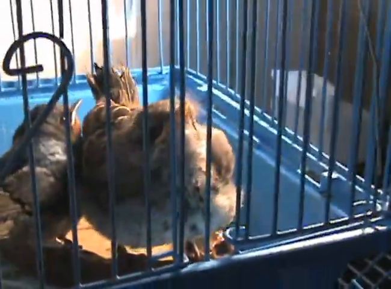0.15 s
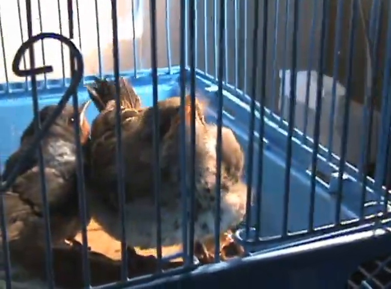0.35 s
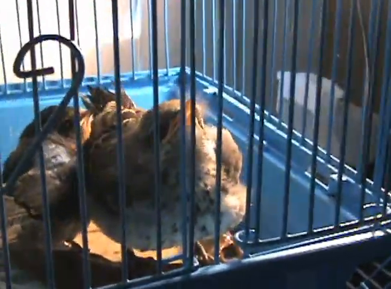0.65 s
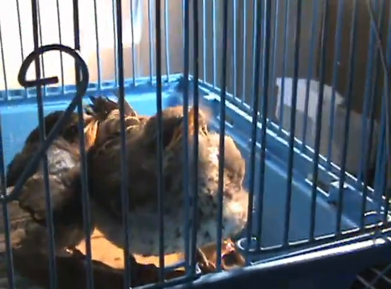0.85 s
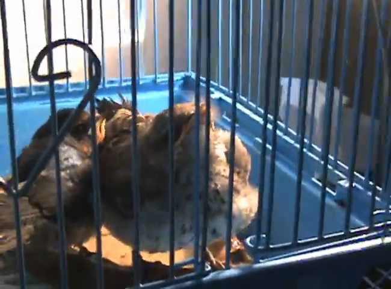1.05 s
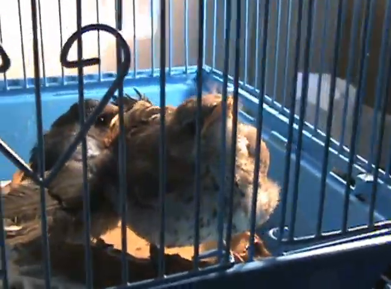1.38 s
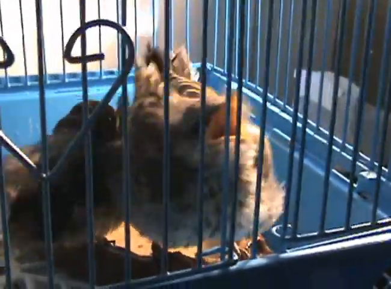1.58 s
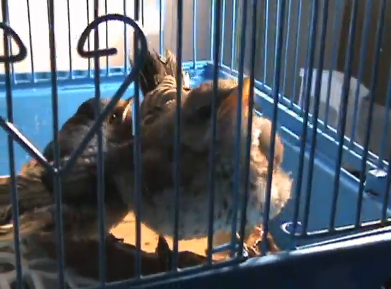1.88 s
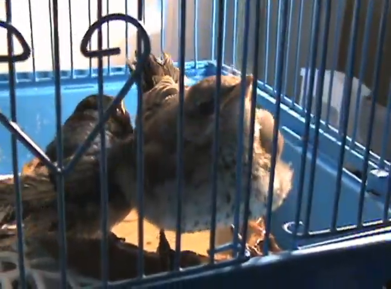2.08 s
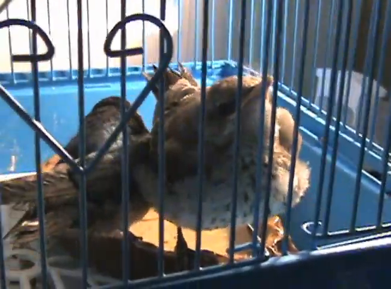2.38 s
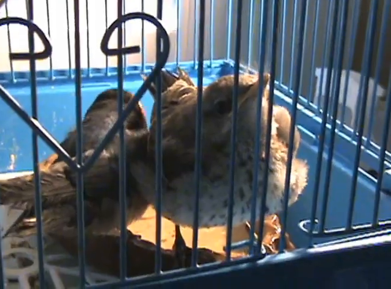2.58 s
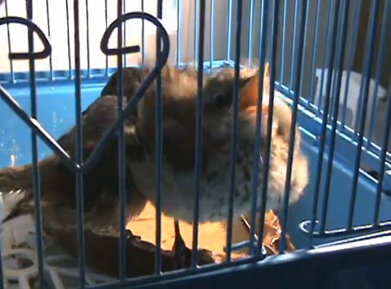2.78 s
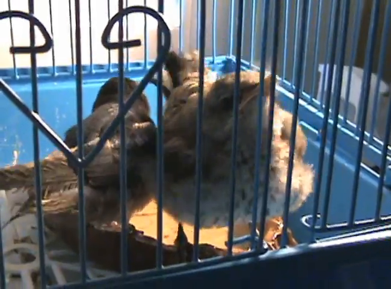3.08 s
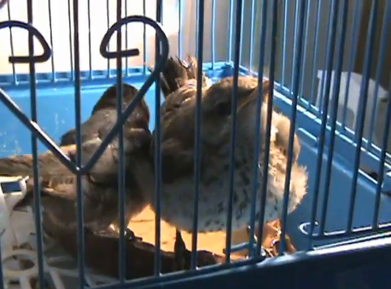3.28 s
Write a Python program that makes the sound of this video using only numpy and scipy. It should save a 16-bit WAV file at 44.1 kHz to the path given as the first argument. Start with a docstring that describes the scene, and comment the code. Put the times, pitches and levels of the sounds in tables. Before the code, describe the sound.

A caged fledgling begs close to the microphone in a small, lightly echoing room. Quiet rumble, soft feather rustles and tiny claw scratches fill the opening; a faint low puff comes at 1.5 s. A loud, thin, gliding cheep with a buzzy edge sounds at 1.6-1.8 s, then a hissier, huskier one at 2.9-3.1 s. Two sharp, rapid taps follow near 3.2 s.

```python
"""In a small room, a fledgling in a wire cage gives two loud, thin begging calls close to the microphone.
Each call is a gliding tone with a fainter octave and sputtering hiss: it flicks up, sags and drops at the end.
The first call adds a buzz below the whistle; the second is hissier, with a husky undertone made of narrow noise.
Shaped noise makes a low puff, rustling feathers, scratching claws and sharp taps.
Echoes follow, over a low room rumble; the recorder limits the loud peaks."""
import sys
import numpy as np
from scipy import signal
from scipy.fft import rfft, irfft, next_fast_len
from scipy.io import wavfile
from scipy.ndimage import uniform_filter1d, minimum_filter1d, map_coordinates

SR = 44100
rng = np.random.default_rng(int(sys.argv[2]) if len(sys.argv) > 2 else 0)


def persist_wave(psi):
    """Save psi, clipped to +-1, as 16-bit WAV."""
    counts = np.round(np.clip(psi, -1, 1) * 32767).astype(np.int16)
    wavfile.write(sys.argv[1], SR, np.atleast_2d(counts).T)


N = 152145
T = np.arange(N) / SR


def amp(db):
    """Turn decibels into gain."""
    return 10 ** (np.asarray(db) / 20)


def unit(x):
    """Scale a sound to an rms of 1."""
    return x / np.sqrt(np.mean(x ** 2) + 1e-20)


def over_time(points):
    """Join (time_s, value) points with straight lines."""
    return np.interp(T, *np.transpose(points))


def over_pitch(points, hz):
    """Join (pitch_hz, value) points along a logarithmic pitch axis."""
    point_hz, value = np.transpose(points)
    return np.interp(np.log(hz + 1), np.log(point_hz + 1), value)


def wobble(rate):
    """Draw a smooth random curve through `rate` random knots a second."""
    return map_coordinates(rng.standard_normal(N // 4), [T * rate], mode="wrap")


def filtered(x, response):
    """Multiply the spectrum of x by a gain that depends on frequency."""
    size = next_fast_len(N + SR // 2)
    hz = np.fft.rfftfreq(size, 1 / SR)
    return irfft(rfft(x, size) * response(hz), size)[..., :N]


def noise(spectrum):
    """Colour random noise with a (pitch_hz, db_per_hz) shape, at an rms of 1."""
    return unit(filtered(rng.standard_normal(N), lambda hz: amp(over_pitch(spectrum, hz))))


def cycles(hz):
    """Add up a pitch curve into a running phase, in radians."""
    return 2 * np.pi * np.cumsum(hz) / SR


# Each call: start_s, end_s, level_db, then relative to that level:
# rasp_db (below and around the whistle), rasp_high_db (above it), air_db, octave_db; last, release_s
CALLS = [(1.607, 1.828, -6, -20, -31, -38.5, -39.5, .018),
         (2.904, 3.129, -7, -20.5, -29.5, -32.5, -31.5, 0.011)]
# Whistle pitch of the two calls: time_s, pitch_hz
FIRST_PITCH = [(1.607, 6300), (1.613, 7250), (1.617, 7080), (1.627, 7220), (1.642, 6920), (1.675, 6835),
               (1.705, 6815), (1.735, 6695), (1.782, 6685), (1.797, 6765), (1.822, 6715), (1.842, 6500)]
SECOND_PITCH = [(2.905, 6800), (2.909, 7680), (2.915, 7270), (2.925, 7270), (2.938, 6940), (2.957, 6765),
                (2.99, 6750), (3.005, 6700), (3.055, 6648), (3.098, 6625), (3.135, 6450)]
# Roughness: harsh at the start, clear in the middle, harsher near the end: time_s, roughness_db
FIRST_ROUGHNESS = [(1.607, 11), (1.635, 3), (1.668, 2), (1.685, -7), (1.71, -15), (1.75, -13), (1.785, -5),
                   (1.80, -8), (1.825, 1), (1.84, 0)]
SECOND_ROUGHNESS = [(2.905, 8), (2.94, 4), (2.995, -1), (3.03, -15), (3.07, -14), (3.10, 5), (3.115, 4),
                    (3.135, -6)]
# Colour of the hiss below and around the whistle: pitch_hz, level_db_per_hz
RASP_COLOUR = [(1000, -41), (2000, -33.5), (2500, -15), (4000, -20.5), (5300, -3), (6200, 9.5), (6800, 8),
               (7300, -26), (9000, -50)]
# Colour of the hiss above the whistle: pitch_hz, level_db_per_hz
RASP_HIGH_COLOUR = [(6000, -42.5), (7200, -1), (7900, 4), (8600, -4.5), (9500, -3), (10500, -26),
                    (13800, -16.5), (15500, -26)]
# Colour of the faint wide hiss, which mostly follows loudness: pitch_hz, level_db_per_hz
AIR_COLOUR = [(120, -11), (420, 0), (1850, -9), (3400, 4), (4800, -2), (7500, -13.5), (11500, -2.5),
              (13200, 1), (15500, -21.5)]
ATTACK_S, SWELL_DB, SWELL_S = 0.0037, 10.5, 0.021  # a sharp start, then a swell to full voice
CATCH_AFTER_S, CATCH_WIDTH_S, CATCH_DB = 0.0075, 0.0011, 11.5  # the voice catches after the opening flick
JITTER_HZ, SHIMMER = 20, 0.055  # pitch and loudness flutter at 0 dB roughness
FLUTTER_RATE = 600  # knots a second
OCTAVE_PEAK_HZ, OCTAVE_WIDTH_HZ = 13520, 900  # a microphone resonance lifts the octave as it passes
RASP_HIGH_GROWS, AIR_GROWS = 1.6, 0.25  # dB per dB of roughness
GRAIN_DB, GRAIN_RATE = 2.5, 260  # sputter of the hiss, knots a second


def call(pitch, roughness, second_voice, start, end, db, rasp_db, rasp_high_db, air_db, octave_db, release_s):
    """Sing one unsteady whistle with its octave, a second voice and hiss that grows with roughness."""
    age = np.maximum(T - start, 0)
    attack = np.clip(age / ATTACK_S, 0, 1)
    release = np.clip(1 - (T - end) / release_s, 0, 1) ** 2
    swell = SWELL_DB * np.exp(-age / SWELL_S)
    catch = CATCH_DB * np.exp(-((age - CATCH_AFTER_S) / CATCH_WIDTH_S) ** 2)
    level = attack * release * amp(db - swell - catch)

    rough = amp(over_time(roughness))
    hz = over_time(pitch) + JITTER_HZ * rough * wobble(FLUTTER_RATE)
    phase = cycles(hz)
    resonance = 1 / np.hypot(1, 2 * (hz * 2 - OCTAVE_PEAK_HZ) / OCTAVE_WIDTH_HZ)
    octave = amp(octave_db + 2 * wobble(200)) * resonance
    shimmer = 1 + SHIMMER * rough * wobble(FLUTTER_RATE)
    whistle = (np.sin(phase) + octave * np.sin(2 * phase)) * shimmer

    rasp = amp(rasp_db) * rough * noise(RASP_COLOUR)
    rasp_high = amp(rasp_high_db) * rough ** RASP_HIGH_GROWS * noise(RASP_HIGH_COLOUR)
    air = amp(air_db) * rough ** AIR_GROWS * noise(AIR_COLOUR)
    sputter = unit(amp(GRAIN_DB * wobble(GRAIN_RATE)))
    hiss = (rasp + rasp_high + air) * sputter
    return level * (np.sqrt(2) * whistle + second_voice + hiss)


def partials(phase, orders, wander):
    """Add unsteady tones at whole multiples of one slow vibration; wander is in radians."""
    total = 0
    for multiple, db in orders:
        level = amp(db + 4.3 * wobble(70.15))
        total = total + level * np.sin(multiple * phase + wander * wobble(BUZZ_RATE))
    return total


# Strength of the first call's buzz: it builds, gives way twice and returns: time_s, level_db
BUZZ_STRENGTH = [(1.615, -48.5), (1.645, -34), (1.695, -28), (1.711, -41.5), (1.728, -29.5), (1.78, -29.5),
                 (1.802, -33), (1.815, -26.5), (1.84, -36)]
# Tones in the buzz: multiple_of_quarter_pitch, level_db
BUZZ_TONES = [(1, -20), (2, -8), (3, 1.5), (5, -1), (6, -11.5), (7, -14.5), (9, -27)]
# Moments when tones another octave lower come in: center_s, half_length_s, level_db
OCTAVE_BREAKS = [(1.713, 0.0098, -27), (1.802, 0.0068, -30.5)]
# Tones in those moments: multiple_of_eighth_pitch, level_db
BREAK_TONES = [(1, -13), (3, -14), (7, -8), (9, 8)]
BUZZ_WANDER, BUZZ_RATE = 0.45, 420  # unsteadiness of each buzz tone: radians, knots a second
WAVER, WAVER_RATE = 0.45, 90  # waver shared by the buzz tones: radians, knots a second


def buzz(phase):
    """Vibrate at a quarter of the pitch, with brief steadier tones built on an eighth."""
    quarter = phase / 4 + WAVER * wobble(WAVER_RATE)
    main = amp(over_time(BUZZ_STRENGTH)) * partials(quarter, BUZZ_TONES, BUZZ_WANDER)
    break_level = sum(amp(db) * np.exp(-((T - s) / half) ** 2) for s, half, db in OCTAVE_BREAKS)
    breaks = break_level * partials(phase / 8, BREAK_TONES, BUZZ_WANDER / 2)
    return np.sqrt(2) * (main + breaks)


def band(phase, rate):
    """Make a narrow band of noise, rms 1, by wobbling a tone; a faster rate widens it."""
    return unit(wobble(rate) * np.sin(phase) + wobble(rate) * np.cos(phase))


# Second call's husky voice below the whistle: time_s, pitch_hz, level_db, lower_octave_db
HUSKY_VOICE = [(2.905, 4900, -42, -43), (2.922, 4900, -40, -42), (2.93, 5450, -33, -55),
               (2.945, 5430, -27, -62), (2.962, 5150, -34, -62), (3.02, 4980, -33, -62),
               (3.05, 4800, -35, -58), (3.063, 4450, -32, -45), (3.09, 4400, -39, -56),
               (3.13, 4400, -46, -62)]
CORE_RATE, HUSK_RATE = 170, 900  # widths of its core and of the husk around it, knots a second
HUSK_DB = 1  # relative to the core


def undertone():
    """Make a husky second voice that steps up, then slides down, at times with its lower octave."""
    s, *columns = np.transpose(HUSKY_VOICE)
    hz, db, lower_db = (np.interp(T, s, column) for column in columns)
    phase = cycles(hz)
    voice = band(phase, CORE_RATE) + amp(HUSK_DB) * band(phase, HUSK_RATE)
    lower_octave = band(phase / 2, CORE_RATE)
    return amp(db) * voice + amp(lower_db) * lower_octave


# Colour of the puff: pitch_hz, level_db_per_hz
PUFF_COLOUR = [(120, -20.5), (400, -2), (3000, -61)]
PUFF_S, PUFF_HALF_S, PUFF_DB = 1.5, 0.03, -46.5  # center, half length, level


def puff():
    """Swell low noise softly up and down just before the first call."""
    return amp(PUFF_DB) * np.exp(-((T - PUFF_S) / PUFF_HALF_S) ** 2) * noise(PUFF_COLOUR)


# Feather rustles: center_s, length_s, level_db
FEATHER_RUSTLES = [(0.217, .18, -51), (.48, 0.32, -59.5), (.915, 0.077, -61.5), (1.481, 0.17, -57.5),
                   (2.655, 0.14, -59.5)]
# Colour of the rustle: pitch_hz, level_db_per_hz
FEATHER_COLOUR = [(500, -29), (1500, -8), (3500, -2), (5000, -2.5), (7000, -2.5), (9500, -6.5),
                  (11000, -16), (15000, -16.5)]


def feathers():
    """Rustle as the bird shuffles: soft swells of noise with a random grain."""
    power = sum(amp(db) ** 2 * np.exp(-(2 * (T - s) / length) ** 2) for s, length, db in FEATHER_RUSTLES)
    grain = amp(3.1 * wobble(300) + 0.8 * wobble(24))
    return np.sqrt(power) * unit(noise(FEATHER_COLOUR) * grain)


# Claw scratches: start_s, level_db, decay_s (time to fall 60 dB)
CLAW_SCRATCHES = [(0.041, -49.5, 0.052), (.376, -47.5, 0.053), (0.554, -47, 0.047), (1.147, -48.5, 0.032)]
# Colour of scratches and taps: pitch_hz, level_db_per_hz
CLAW_COLOUR = [(300, -23.5), (3800, 1), (6000, 0), (10000, -4.5), (15500, -20.5)]
SCRATCH_RISE_S = 0.006


def claws():
    """Scrape the cage floor: gritty noise that rises quickly and dies away."""
    level = 0
    for s, db, decay in CLAW_SCRATCHES:
        rise = np.clip((T - s) / SCRATCH_RISE_S, 0, 1)
        fall_db = 60 * np.maximum(T - s - SCRATCH_RISE_S, 0) / decay
        level = level + rise * amp(db - fall_db)
    return level * unit(noise(CLAW_COLOUR) * amp(3 * wobble(1200)))


# Sharp taps of a beak or claw: start_s, level_db
SHARP_TAPS = [(3.192, -31.5), (3.2039, -30.5), (3.245, -50.5)]
CLICK_T60_S, RATTLE_T60_S = 0.0058, 0.097  # times to fall 60 dB
RATTLE_DB = -11  # the cage's softer answer, relative to the click


def taps():
    """Make each tap a very short noise click with a softer, longer rattle of the cage."""
    level = 0
    for s, db in SHARP_TAPS:
        age = np.maximum(T - s, 0)
        click = amp(-60 * age / CLICK_T60_S)
        rattle = amp(RATTLE_DB - 60 * age / RATTLE_T60_S)
        level = level + (T >= s) * amp(db) * (click + rattle)
    return noise(CLAW_COLOUR) * level


# How long the echoes last: pitch_hz, time_to_fall_60_db_s
ECHO_TIMES = [(3000, 0.75), (6700, 0.37)]
ROOM_SIDE_DB = -7  # left-right difference in the echoes, relative to their shared part


def room(x):
    """Echo a sound in stereo with fading noise; each frequency dies at its own speed."""
    hz, t, z = signal.stft(rng.standard_normal((2, SR)), SR, nperseg=256)
    fade = amp(-60 * t / over_pitch(ECHO_TIMES, hz)[:, None])
    tail = signal.istft(z * fade, SR, nperseg=256)[1]
    tail = tail / np.linalg.norm(tail[0])
    mid, side = signal.fftconvolve(x[None], tail, axes=1)[:, :N]
    side = amp(ROOM_SIDE_DB) * side
    return np.array([mid + side, mid - side])


# Colour of the steady room noise: pitch_hz, level_db_per_hz
FLOOR_COLOUR = [(30, -16), (62, -1.5), (200, -10.5), (1100, -18), (4310, -29.5), (8880, -32.5),
                (15500, -48.5)]
# How alike left and right are: pitch_hz, likeness (1 is identical)
STEREO_LIKENESS = [(130, 0.95), (900, 0.16), (5980, 1)]
# Low room resonances: pitch_hz, width_hz, level_db
LOW_RESONANCES = [(43, 12, -59), (135, 15, -59), (280.3, 38, -61)]
FLOOR_DB = -50.56  # in each channel


def background():
    """Mix the room's steady rumble and hiss with low resonances made of narrow noise."""
    def shares(hz):
        # the likeness sets how much is shared (mid) and how much differs (side)
        angle = np.arccos(np.clip(over_pitch(STEREO_LIKENESS, hz), -1, 1)) / 2
        return np.array([np.cos(angle), np.sin(angle)])

    mid, side = filtered(np.array([noise(FLOOR_COLOUR), noise(FLOOR_COLOUR)]), shares)
    drone = 0
    for center, width, db in LOW_RESONANCES:
        hum = filtered(rng.standard_normal(N), lambda hz: 1 / (1 + (2 * (hz - center) / width) ** 2))
        drone = drone + amp(db) * unit(hum)
    return amp(FLOOR_DB) * np.array([mid + side, mid - side]) + drone


ROOM_DB = -14  # echoes relative to the direct sound
BALANCE_DB = 0.25  # left is raised and right lowered by this much


def scene():
    """Put the bird and its cage into the room, then add the background."""
    first_buzz = buzz(cycles(over_time(FIRST_PITCH)))
    first = call(FIRST_PITCH, FIRST_ROUGHNESS, first_buzz, *CALLS[0])
    second = call(SECOND_PITCH, SECOND_ROUGHNESS, undertone(), *CALLS[1])
    bird = first + second + puff() + feathers() + claws() + taps()
    balance = amp([[BALANCE_DB], [-BALANCE_DB]])
    return (bird + amp(ROOM_DB) * room(bird)) * balance + background()


LIMIT_DB, LIMIT_HOLD_S = -2.5, 0.004  # peak limit below full scale, hold and smoothing time
TOP_HZ = 15850  # nothing is kept from here up


def record(dry):
    """Turn loud peaks down with a fast limiter, then cut off the highest frequencies."""
    size = int(LIMIT_HOLD_S * SR)
    peak = np.abs(dry).max(axis=0) + 1e-9
    needed = np.minimum(1, amp(LIMIT_DB) / peak)
    gain = uniform_filter1d(minimum_filter1d(needed, size), size)
    return filtered(dry * gain, lambda hz: hz < TOP_HZ)


dry = scene()
out = record(dry)
persist_wave(out)
```